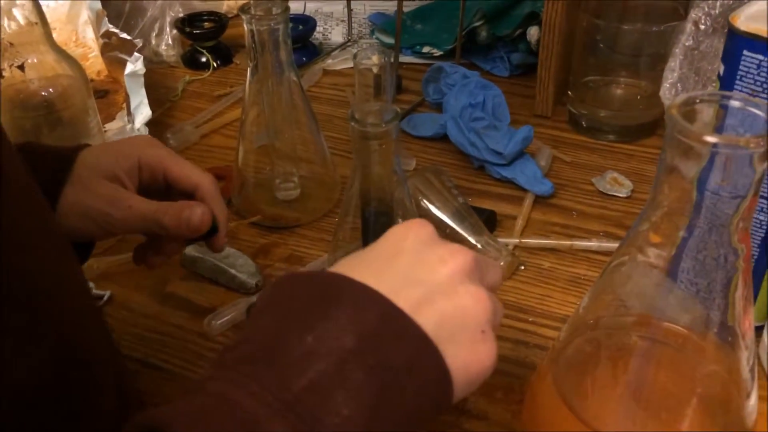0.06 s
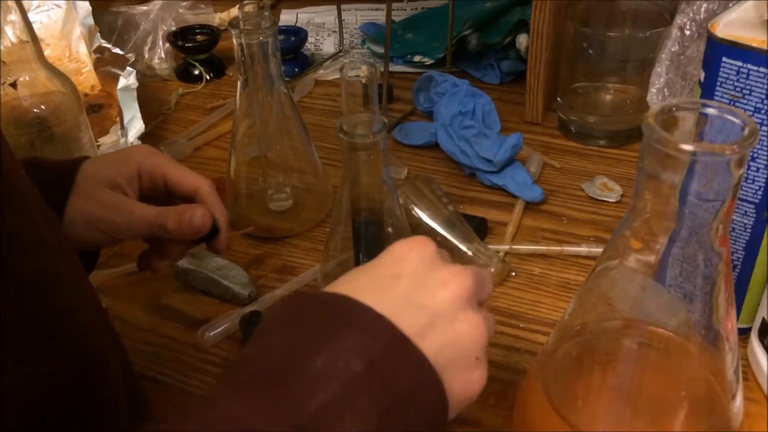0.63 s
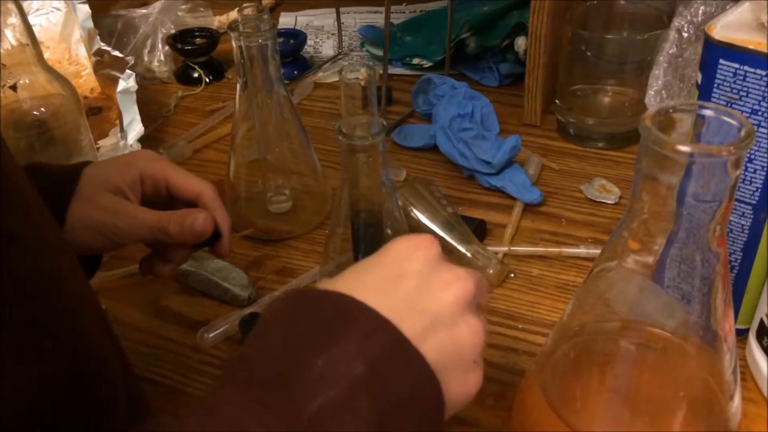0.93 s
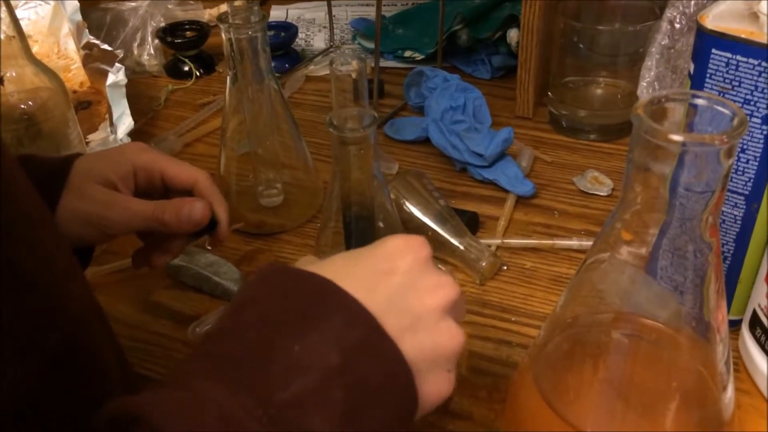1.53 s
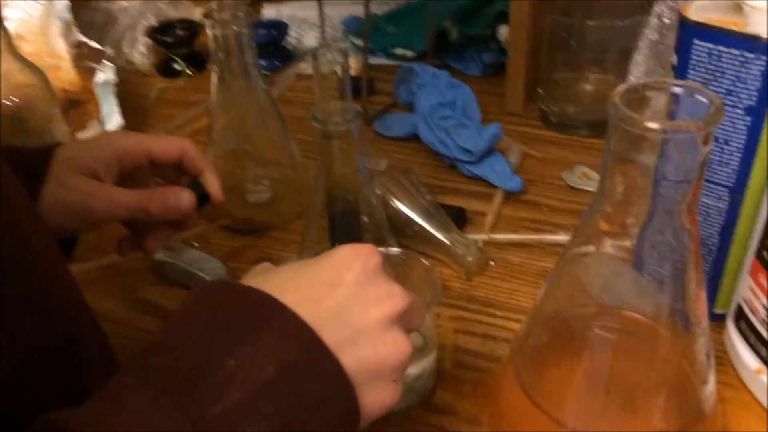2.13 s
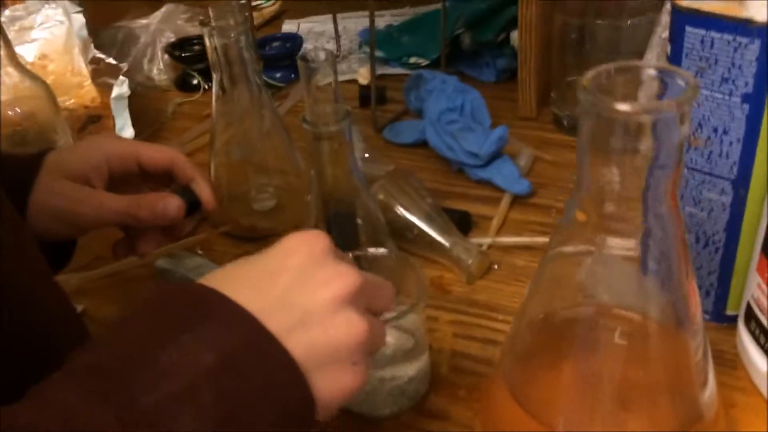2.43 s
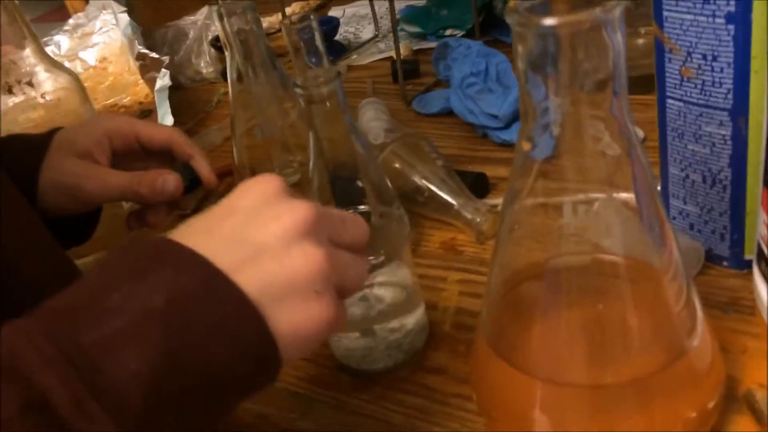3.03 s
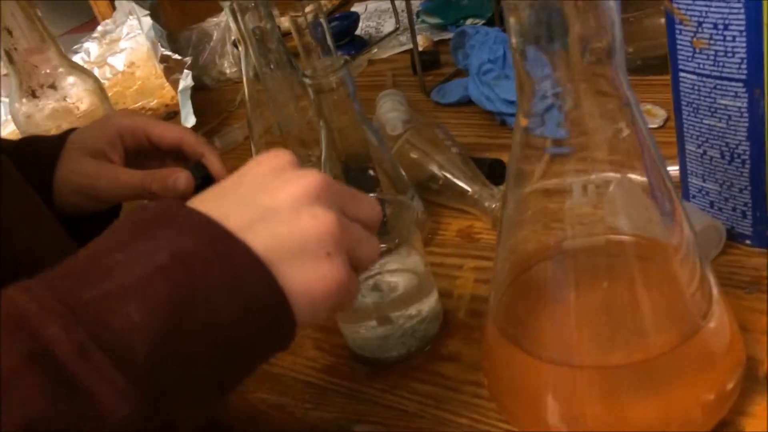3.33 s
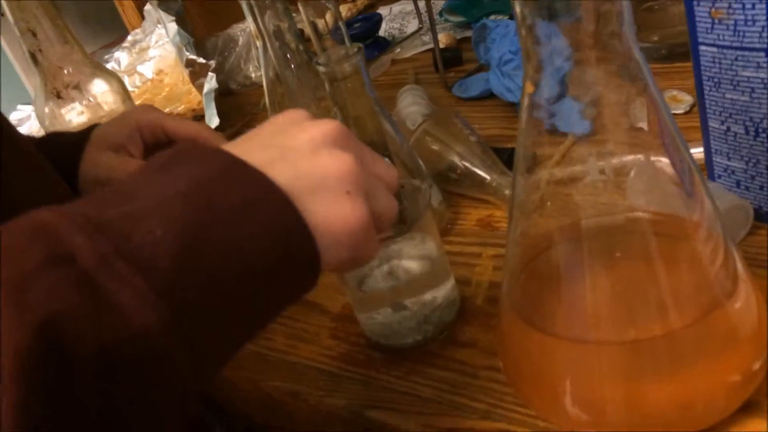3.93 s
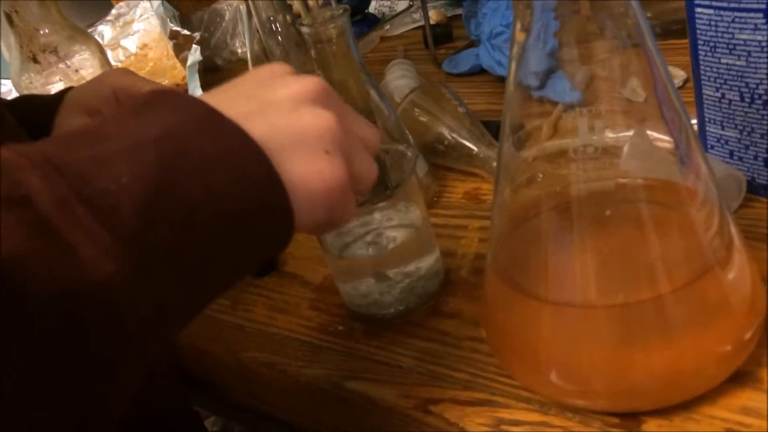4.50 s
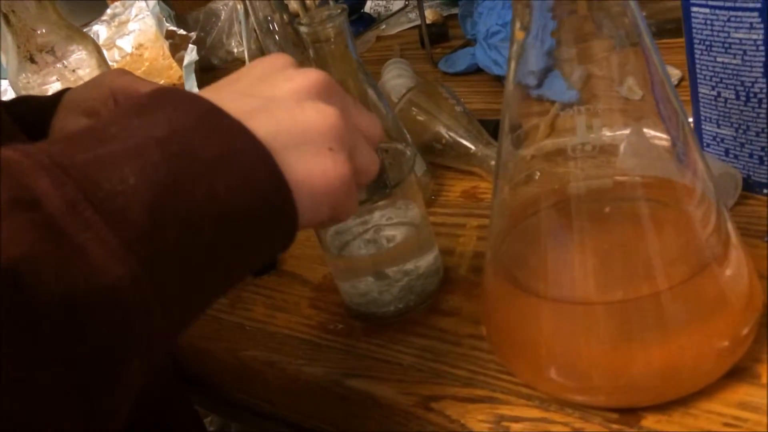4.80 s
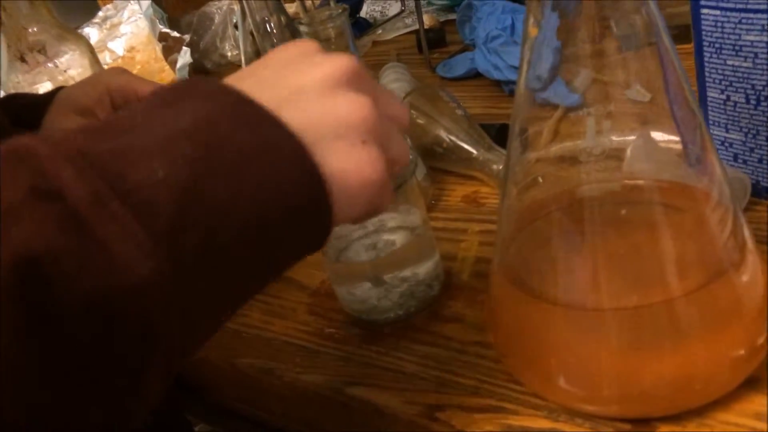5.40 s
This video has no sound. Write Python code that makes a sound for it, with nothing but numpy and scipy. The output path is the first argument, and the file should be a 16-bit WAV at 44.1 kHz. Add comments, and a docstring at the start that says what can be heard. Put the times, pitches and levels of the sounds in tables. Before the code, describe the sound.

In a small room with a soft hush, metal pieces quietly tick and grate inside a glass flask as it slides on wood. Then comes a run of sharp, hand-muted glass knocks on the tabletop, the pieces chattering and the table thudding under each. Two more single knocks follow, with light ticks and small liquid plops between them, all heard from nearby.

```python
"""A small glass flask is knocked eight times on a wooden table, after being slid over it.
The hand damps the glass, so each clink is short; the table top thuds under it and a small room answers.
The flask holds metal pieces in liquid. They chatter at each knock, and between the knocks
they tick and grate on the glass while the liquid plops. A soft room hush lies under it all."""
import sys
import numpy as np
from scipy import signal
from scipy.fft import rfft, irfft, next_fast_len
from scipy.io import wavfile

SR = 44100
rng = np.random.default_rng(int(sys.argv[2]) if len(sys.argv) > 2 else 0)


def log_audio(samples):
    """Write samples as a 16-bit WAV file to the path given in sys.argv[1]."""
    # one column per channel
    frames = np.atleast_2d(samples).T
    # limit to full scale, then quantise
    limited = np.clip(frames, -1, 1)
    pcm = np.round(limited * 32767).astype(np.int16)
    wavfile.write(sys.argv[1], SR, pcm)


N = 245195
T = np.arange(SR // 2) / SR  # half a second of time, for one short sound

# The room's hush. Each row: frequency in Hz, relative level in dB.
HUSH_SPECTRUM = [(15, -26.5), (28, -13.5), (42, 2), (75, -1.5), (105, -5), (170, -2), (270, -10),
                 (600, -15), (1300, -20), (1950, -20), (2400, -22.5), (6000, -25), (15500, -29.5)]
# The room's echo. Each row: frequency in Hz, fade time in seconds (the time to drop 60 dB).
ROOM_FADE_TIMES = [(150, 0.8), (600, 0.42), (2000, 0.2559), (5000, 0.26), (12000, 0.1739)]
# The tone of that echo. Each row: frequency in Hz, relative level in dB.
ROOM_SPECTRUM = [(150, 0), (600, 2.5), (2000, 4.5), (5000, -1.5), (12000, -1.5)]
# Echoes from near surfaces. Each row: delay in seconds, level in dB.
NEAR_ECHOES = [(.0023, -19.5), (.0069, -19.5), (0.0124, -16)]
# Glassware ringing on. Each row: start in seconds, pitch in Hz, level in dB, fade time in seconds.
GLASSWARE_RINGS = [(3.431, 3750, -87, 1.1), (3.431, 5700, -75, 1.3), (5.428, 1986, -69, 0.79),
                   (5.428, 3980, -74.5, 0.99)]
# Bubbles in the liquid. Each row: start in seconds, level in dB, pitch in Hz.
BUBBLES = [(.325, -43, 1306), (.555, -45, 1124), (0.587, -41.5, 870), (0.596, -45.5, 836),
           (.617, -41.5, 868), (0.62, -40.5, 2060), (.732, -50.5, 860), (2.449, -53.5, 1430),
           (2.622, -27, 1833), (4.0108, -38.5, 1830), (4.04, -41.5, 1795), (4.050, -38.5, 1322),
           (4.08, -47.5, 1260), (4.9245, -45, 1393), (5.124, -45.5, 1356), (5.161, -45.5, 2320)]
# Short pushes of the flask. Each row: start in seconds, length in seconds, level in dB.
PUSHES = [(.32, 0.043, -65.5), (.565, 0.078, -58.5), (.74, 0.019, -61.5), (2.43, 0.042, -66.5),
          (3.79, .04, -66.5)]
# Glass rubbing on wood. Each row: frequency in Hz, relative level in dB.
RUB_SPECTRUM = [(100, -25), (650, -9), (880, 4), (1300, 2.5), (1700, 1), (2150, 2), (3000, -13.5),
                (6000, -15), (15000, -37)]
# The pieces shift in the moved flask. Each row: start in seconds, length in seconds, level in dB.
PIECE_SHIFTS = [(0, 0.18, -72), (.43, 0.32, -68), (2.24, 0.24, -74), (3.76, 0.052, -62),
                (3.92, 0.19, -74.5), (4.99, 0.056, -51), (5.12, 0.036, -59), (5.3, 0.3, -74)]
# Metal grating on glass. Each row: frequency in Hz, relative level in dB.
GRATE_SPECTRUM = [(100, -27.5), (700, -10), (1400, 1), (3500, -2), (5000, 0.5), (6200, -1.5), (8200, -9.5),
                  (10500, -10.5), (12200, -4.5), (13200, -6.5), (15000, 2)]
# Clear touches of metal on glass. Each row: start in seconds, level in dB, extra treble in dB.
TOUCHES = [(0.107, -48.5, -7), (.216, -61.5, 13), (.494, -48.5, 3.5), (.571, -40.5, -11), (.584, -41, -5),
           (0.594, -39.5, -15), (0.614, -30, -16.5), (.668, -46, 5.5), (2.297, -53, -4),
           (2.329, -46.5, -17), (2.357, -59.5, 3.5), (2.426, -56.5, 5.5), (2.716, -62, 10.5),
           (2.768, -58.5, 8.5), (3.76, -48, -6), (3.796, -51, -6), (3.948, -52, -5), (3.967, -51, -2),
           (4.046, -35, -0.5), (4.0733, -42.5, 5.5), (5.003, -44.5, 6), (5.125, -44, 5), (5.138, -43, 5),
           (5.16, -49, .5), (5.202, -53, 1), (5.323, -62, 10), (5.393, -41.5, 0.5)]
# The snap of one touch. Each row: frequency in Hz, relative level in dB.
TICK_SPECTRUM = [(100, -23.5), (700, -13), (1400, 1.5), (4000, 2), (9000, 0.5), (15000, -7.5)]
# The table top's own tones. Each row: pitch in Hz, level in dB, fade time in seconds.
WOOD_TONES = [(127, -32.5, 0.23), (161.6, -32.5, 0.15), (232.6, -22, 0.14), (328, -37, 0.17),
              (390, -28, 0.12), (440.5, -35, 0.24), (689.8, -26.5, 0.097)]
# The blurred rest of the table's shaking. Each row: frequency in Hz, relative level in dB.
BOOM_SPECTRUM = [(20, -36.5), (45, -22), (90, -9), (140, -0.5), (240, -2), (290, -7), (440, -4.5),
                 (540, -16), (800, -19), (2000, -47)]
# The pieces chattering on the glass. Each row: frequency in Hz, relative level in dB.
CHATTER_SPECTRUM = [(30, -45), (100, -26.5), (550, -20.5), (900, -3), (2200, 5.5), (4700, -3), (6300, -8),
                    (8000, 0.5), (9700, -9.5), (10500, -21), (11200, -17.5), (12000, -1), (13000, -18.5),
                    (14500, -20.5), (15500, -26.5)]
# The held flask's own tones; a few high ones escape the grip and ring longer.
# Each row: pitch in Hz, level in dB, fade time in seconds.
FLASK_TONES = [(901, -13, 0.031), (1104, -13, 0.027), (1322, -20, .035), (1549.6, -11, 0.057),
               (1794, -15, 0.023), (1843, -12.5, .04), (2056, -5.5, 0.056), (2212, -6, 0.03),
               (2358, -9, 0.042), (2730, -8.5, 0.015), (2870, -17, 0.047), (3220, -15.5, 0.027),
               (3810, -17.5, 0.014), (4570, -13.5, 0.017), (4793, -7.5, 0.022), (4923, -20, 0.06),
               (5913, -12.5, 0.014), (7280, -9, .014), (7410, -11.5, 0.023), (8050, -9, 0.034),
               (8200, -21.5, 0.065), (9480, -16, .018), (11855, -2, 0.017), (11840, -19.5, 0.046),
               (12320, -6, 0.012), (12245, -21, 0.048)]
# Eight knocks and five softer bumps. Each row: start in seconds, level in dB, hollowness (1 kHz and
# below) in dB, pitch the struck spot favours in Hz, its boost in dB, then treble, chatter and thud in dB.
FLASK_KNOCKS = [(0.748, -56, -4, 1990, -1, 8.5, 2, -6), (2.6133, -25.5, 4, 1750, 0, 5.5, 1.5, 3),
                (2.715, -59.5, -1.5, 2000, -1, 0, -9.5, 25.5), (2.859, -17.5, 4, 2110, 5, -5.5, -2.5, 1),
                (3.0384, -15, 1.5, 2150, 6.5, .5, -1, 1), (3.215, -13, -5.5, 1250, 6.5, -1, -3.5, 2),
                (3.4304, -18, -3, 1640, 5.5, 0.5, 1, 1), (3.685, -26, 1.5, 1600, 4.5, -6, -2.5, 3),
                (3.804, -52, 5, 1470, 12.5, 6.5, -4, 19.5), (3.834, -60.5, 19, 1390, 12, -14, -4, 36.5),
                (4.3683, -15.5, -2, 1540, 3, 1, -3.5, 4), (5.0216, -13.5, -3.5, 2120, -6, 11, -6, 1.5),
                (5.065, -32.5, 3, 1290, 8, -10, -5, 19)]


def amp(db):
    """Turn decibels into a gain."""
    return 10 ** (np.asarray(db) / 20)


def unit(x):
    """Scale a sound to an average (rms) level of 1."""
    return x / np.sqrt(np.mean(x ** 2) + 1e-20)


def along(points, hz):
    """Read between (Hz, value) rows on a log frequency scale."""
    freqs, values = np.transpose(points)
    return np.interp(np.log(hz + 1), np.log(freqs + 1), values)


def coloured(x, colour):
    """Filter a sound; colour(hz) gives the gain in dB."""
    size = next_fast_len(len(x) + 8192)
    gain = amp(colour(np.fft.rfftfreq(size, 1 / SR)))
    return irfft(rfft(x, size) * gain, size)[:len(x)]


def noise(spectrum, count):
    """Noise with the given spectrum, at level 1."""
    return unit(coloured(rng.standard_normal(count), lambda hz: along(spectrum, hz)))


def fade(seconds):
    """Die away by 60 dB in the given time."""
    return np.exp(-np.log(1000) * T / seconds)


def rise(seconds):
    """A soft start."""
    return 1 - np.exp(-T / seconds)


def add(track, start, sound):
    """Mix a sound into the track; start is in seconds."""
    part = track[round(start * SR):][:len(sound)]
    part += sound[:len(part)]


def ring(tones, colour, scatter_db, detune_hz):
    """A struck object's tones; strength and pitch vary a little with the grip and the spot hit."""
    out = np.zeros(len(T))
    for k, (hz, db, fade_s) in enumerate(tones):
        gain = amp(db + colour(hz) + scatter_db * rng.standard_normal())
        pitch = hz + detune_hz * rng.standard_normal()
        out += (-1) ** k * gain * fade(fade_s) * np.sin(2 * np.pi * pitch * T)
    return out


def slipping(spectrum, per_second, spread_db):
    """Friction: many tiny slips of uneven size, at level 1."""
    slips = (rng.random(N) < per_second / SR) * rng.choice([-1, 1], N)
    sizes = amp(spread_db * rng.standard_normal(N))
    return unit(coloured(slips * sizes, lambda hz: along(spectrum, hz)))


def movements(rows, attack_s, release_s):
    """The loudness of a series of movements: each builds up, holds and dies away."""
    t = np.arange(N) / SR
    out = np.zeros(N)
    for start, length, db in rows:
        build_up = np.clip((t - start) / attack_s, 0, 1)
        die_away = np.exp(-np.maximum(t - start - length, 0) / release_s)
        out += amp(db) * build_up * die_away
    return out


def room_hush(level_db=-68.5):
    """The low, steady hush of the room."""
    return amp(level_db) * noise(HUSH_SPECTRUM, N)


def in_room(x, tail_db):
    """The direct sound, echoes from near surfaces and a blurred tail."""
    hz, t, bands = signal.stft(rng.standard_normal(len(T)), SR, nperseg=256)
    decay = np.exp(-np.log(1000) * t / along(ROOM_FADE_TIMES, hz)[:, None])
    tone = amp(along(ROOM_SPECTRUM, hz))[:, None]
    tail = signal.istft(bands * decay * tone, SR)[1][:len(T)] * rise(0.0015)
    answer = amp(tail_db) * tail / np.linalg.norm(tail)
    answer[0] += 1  # the direct sound
    for delay, db in NEAR_ECHOES:
        add(answer, delay, amp(db) * np.array([1, 2, 1]) / 4)  # a slightly dulled echo
    return signal.fftconvolve(x, answer)[:len(x)]


def glassware(width_hz=45):
    """Glassware rings on after a jolt with faint, slightly fuzzy tones."""
    out = np.zeros(N)
    for start, pitch, db, fade_s in GLASSWARE_RINGS:
        peak = lambda hz: -20 * np.log10(1 + ((hz - pitch) / width_hz) ** 2)
        tone = unit(coloured(rng.standard_normal(len(T)), peak))
        add(out, start, amp(db) * tone * fade(fade_s) * rise(0.0024))
    return out


def plops(glide=0.93, splash_db=-11):
    """Bubbles ring briefly, rising a little in pitch, each inside a small splash."""
    out = np.zeros(N)
    for start, db, hz in BUBBLES:
        bubble = np.sin(2 * np.pi * hz * (T + glide * T ** 2)) * fade(0.038)
        around_pitch = [(hz / 2, -30), (hz * 0.77, -7), (hz, 0), (hz * 3, -32), (hz * 8, -50)]
        splash = amp(splash_db) * noise(around_pitch, len(T)) * fade(0.069)
        add(out, start, amp(db) * (bubble + splash) * rise(0.00049))
    return out


def grating(shifting):
    """The metal pieces grate on the glass as they shift."""
    return shifting * slipping(GRATE_SPECTRUM, per_second=450, spread_db=5)


def ticks(shifting, strays_per_second=30, stray_db=9, spread_db=3):
    """Metal touches the glass in short snaps; stray ones fall at random while the pieces shift."""
    count = int(strays_per_second * N / SR)
    places = ((np.arange(count) + rng.random(N)[:count]) * N / count).astype(int)
    sizes = amp(stray_db + spread_db * rng.standard_normal(N)[:count])
    strays = np.bincount(places, sizes * shifting[places], N)
    shape = (fade(0.0056) + amp(-10.5) * fade(0.055)) * rise(0.0001)
    out = np.zeros(N)
    for start, db, treble_db in TOUCHES:
        treble = lambda hz: along([(2000, 0), (12000, treble_db)], hz)
        snap = coloured(noise(TICK_SPECTRUM, len(T)), treble)
        add(out, start, amp(db) * snap * shape)
    return out + noise(TICK_SPECTRUM, N) * signal.fftconvolve(strays, shape)[:N]


def sliding():
    """The flask's foot rubs on the wood with each push."""
    pushing = movements(PUSHES, attack_s=0.013, release_s=0.014)
    return pushing * slipping(RUB_SPECTRUM, per_second=1700, spread_db=3)


def table_thud():
    """The table top swings with a few low tones and a blurred boom."""
    boom = amp(-25.5) * noise(BOOM_SPECTRUM, len(T)) * fade(0.2)
    wood = ring(WOOD_TONES, lambda hz: 0, scatter_db=1.5, detune_hz=3)
    return (wood + boom) * rise(0.011)


def chatter(colour, burst_db):
    """The pieces land on the glass in a sharp burst, then settle."""
    burst = amp(burst_db) * (amp(1) * fade(0.0056) + amp(-4.5) * fade(0.025))
    settling = amp(-22.5) * fade(0.15)
    return coloured(noise(CHATTER_SPECTRUM, len(T)), colour) * rise(0.00032) * (burst + settling)


def knocks():
    """Each knock rings the glass, makes the pieces chatter and shakes the table top."""
    out = np.zeros(N)
    for start, db, hollow_db, spot_hz, spot_db, treble_db, chatter_db, thud_db in FLASK_KNOCKS:
        # the spot that lands favours nearby tones; each knock has its own brightness and hollowness
        favoured = lambda hz: spot_db * np.exp(-((hz - spot_hz) / 200) ** 2)
        balance = [(1000, hollow_db), (1600, 0), (3000, 0), (12000, treble_db)]
        colour = lambda hz: favoured(hz) + along(balance, hz)
        clink = ring(FLASK_TONES, colour, scatter_db=1.2, detune_hz=20) * rise(0.0002)
        knock = clink + chatter(colour, chatter_db) + amp(thud_db) * table_thud()
        add(out, start, amp(db) * in_room(knock, tail_db=-18))
    return out


def scene():
    """Small sounds and knocks over the hush of the room."""
    shifting = movements(PIECE_SHIFTS, attack_s=0.016, release_s=0.053)
    small_sounds = ticks(shifting) + grating(shifting) + sliding() + plops() + glassware()
    return (in_room(small_sounds, tail_db=-17) + knocks() + room_hush())[None]


def record(dry):
    """Clip the peaks at full scale and cut the very highest treble."""
    treble_cut = lambda hz: np.interp(hz, [15400, 16500], [0, -70])
    return coloured(np.clip(dry[0], -1, 1), treble_cut)[None]


dry = scene()
out = record(dry)
log_audio(out)
```